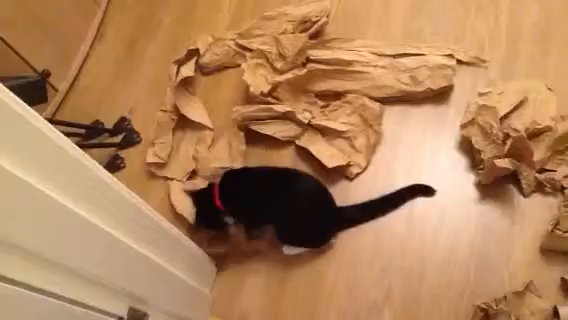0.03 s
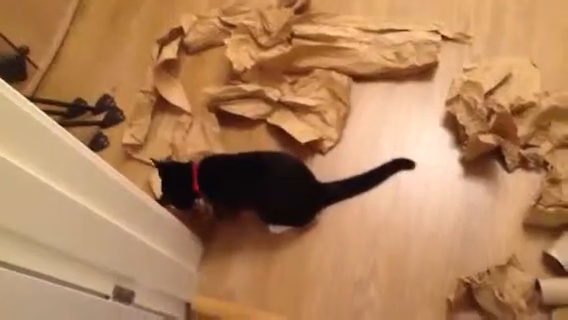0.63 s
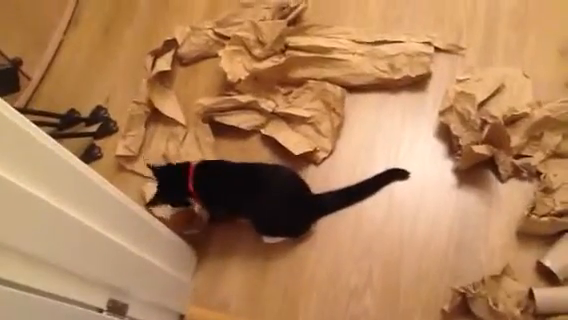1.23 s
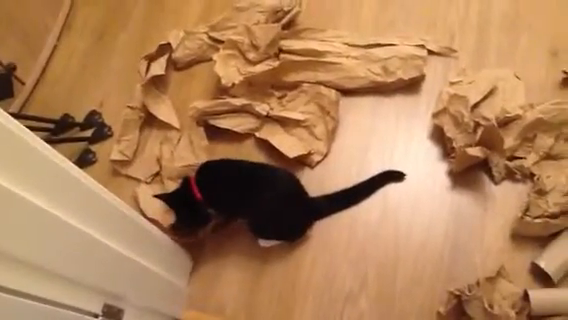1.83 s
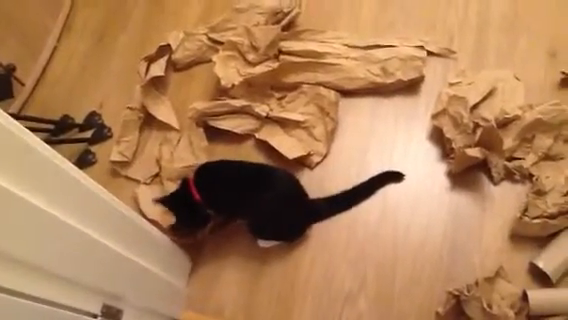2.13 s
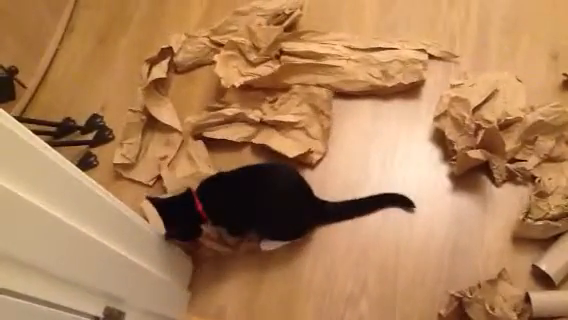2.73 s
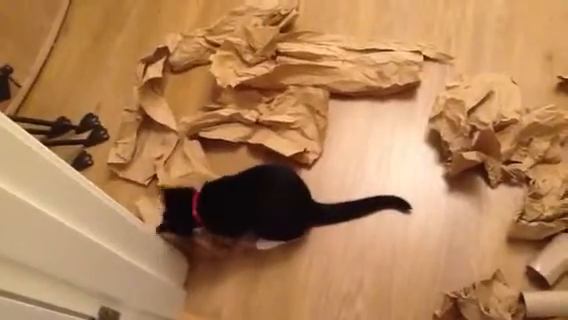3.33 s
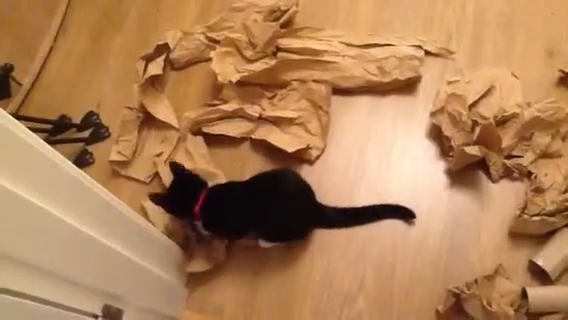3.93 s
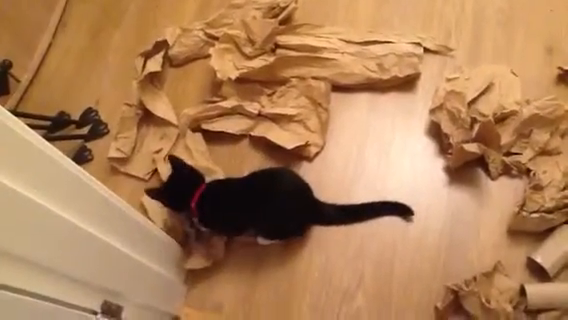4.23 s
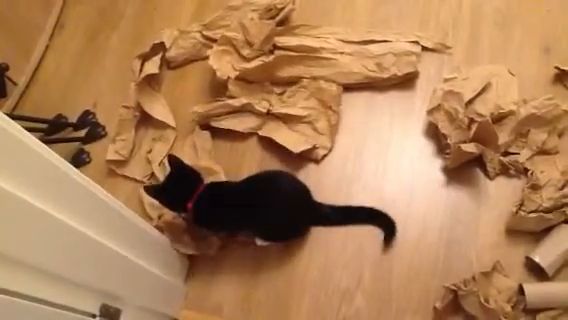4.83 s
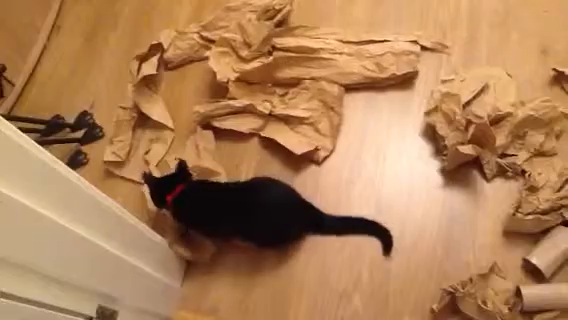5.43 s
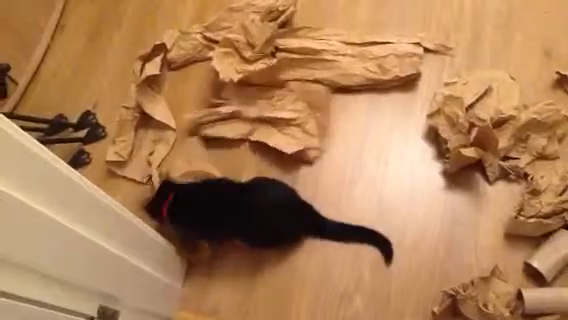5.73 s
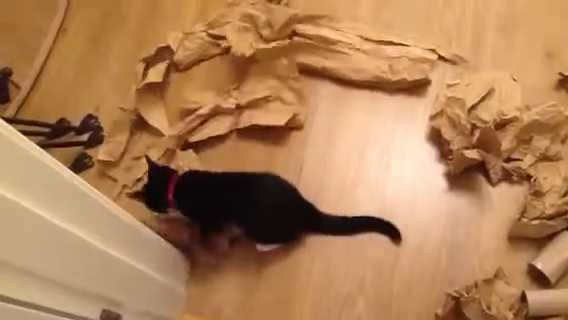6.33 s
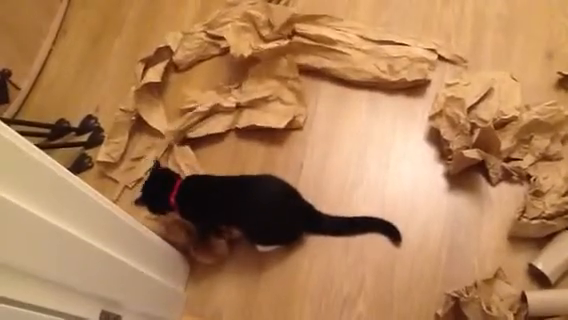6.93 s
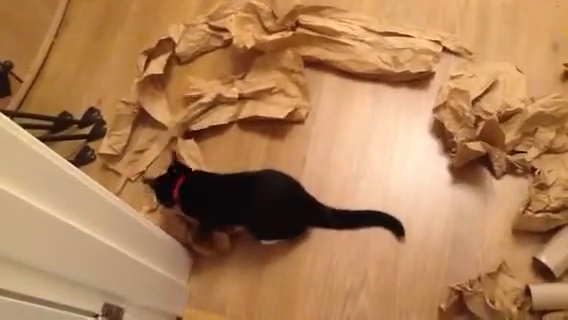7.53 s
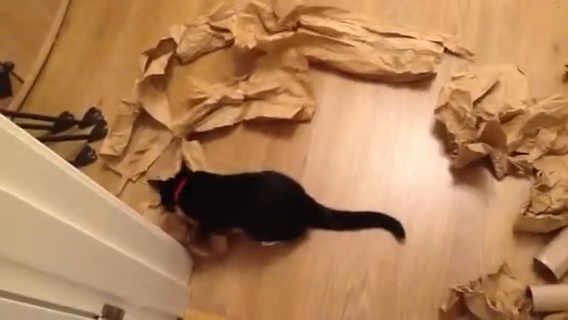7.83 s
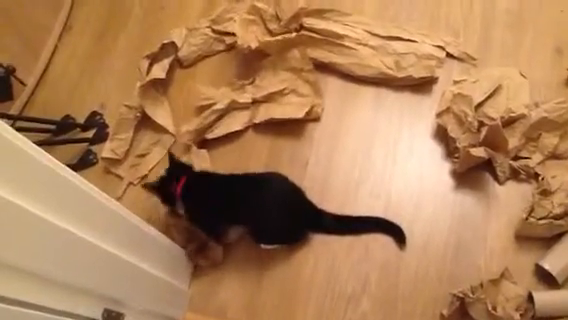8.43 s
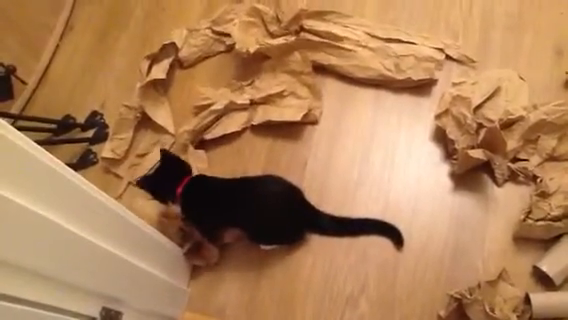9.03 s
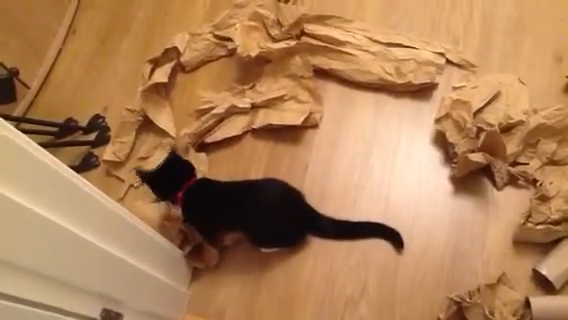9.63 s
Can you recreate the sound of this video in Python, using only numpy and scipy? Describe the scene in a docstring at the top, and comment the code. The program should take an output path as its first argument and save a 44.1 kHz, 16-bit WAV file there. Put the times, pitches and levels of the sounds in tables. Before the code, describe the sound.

A kitten paws at crumpled packing paper in a small bare room, heard close up over faint hiss. The paper crackles in uneven bursts, with stiff folds snapping and hollow little pops. A paw bumps the wooden floor and a collar bell clacks. Lighter rustles follow, then a quick run of soft bumps and the longest rustle. Near the end, after more crinkling, the bell tinkles briefly.

```python
"""A small bare room with a wooden floor; a small microphone close to the packing paper beside the door.
Over faint hiss a kitten paws at the crumpled paper: each push buckles a swarm of creases, stiff folds
snap and broad panels pop. A paw bumps the wood and the collar bell clacks. Lighter pushes follow, a run
of bumps just after four seconds, then the longest rustle around six. Near the end the bell tinkles
freely. The room rings briefly after every sound."""
import sys
import numpy as np
from scipy import signal
from scipy.fft import rfft, irfft
from scipy.io import wavfile
from scipy.ndimage import uniform_filter1d

SR = 44100
rng = np.random.default_rng(int(sys.argv[2]) if len(sys.argv) > 2 else 0)


def transcribe(signal):
    """Save signal, clipped to [-1, 1], as a 16-bit WAV file at the path in sys.argv[1]."""
    frames = np.atleast_2d(signal).T
    limited = np.clip(frames, -1, 1)
    pcm = np.round(limited * 32767).astype(np.int16)
    wavfile.write(sys.argv[1], SR, pcm)


N = 426888
TIME = np.arange(N) / SR
BINS_HZ = np.fft.rfftfreq(N, 1 / SR)

# The tone of the packing paper. Each row: frequency in Hz, gain in dB.
PAPER_SPECTRUM = [(50, -61), (110, -19.5), (170, -8.5), (260, -4.5), (370, -5.5), (750, -2.5), (1400, 1),
                  (2300, -2), (3600, -2.5), (7500, -3.5), (9500, -5), (11200, -4), (13500, -7), (15500, -7)]
# Stiff folds snapping; a long one is a run of creases giving way together.
# Each row: start in seconds, relative peak in dB, dullness in dB, t60 in seconds.
FOLD_SNAPS = [(.011, -36.5, -16, .02), (.085, -33.5, 1, .029), (0.127, -22, -1, .042),
              (0.2399, -30, -15, .036), (.344, -34, -3, 0.28), (.371, -27.5, 0, 0.04),
              (0.5314, -42, -4, 0.039), (0.638, -41, -16, 0.018), (0.7351, -34, -0.5, 0.32),
              (.765, -30, -6.5, 0.12), (1.11, -54.5, 0, 0.15), (1.5, -36, 1, 0.022),
              (1.5706, -30.5, -20, 0.019), (2.3123, -33, 2.5, .035), (2.5618, -33.5, -3, 0.039),
              (2.5736, -31, 2, 0.092), (2.663, -28, -23, 0.047), (2.679, -32.5, -1.5, 0.028),
              (2.924, -49, -22, 0.04), (3.056, -53.5, 6, 0.044), (3.1777, -54, -16, 0.023),
              (3.3408, -52, -12, 0.031), (3.386, -31, -20, .025), (3.408, -35, -18, .018),
              (3.5125, -36.5, 1, 0.065), (3.532, -32, -0.5, 0.068), (4.188, -37, 18, 0.09),
              (4.555, -43, 0, 0.14), (4.592, -30, -2, .011), (5.676, -32, -15, 0.025),
              (5.796, -31.5, -9, 0.042), (5.8436, -29.5, -17, .015), (6.038, -31, 0, 0.022),
              (6.157, -32, -10, .085), (6.227, -26, -4.5, .1), (7.357, -53, -10.5, 0.035),
              (7.589, -41, 4, .029), (7.7654, -32, -24, 0.013), (7.829, -39.5, 4, 0.026),
              (7.97, -39, -4, 0.035), (8.054, -30, -14, .014), (8.112, -34.5, -19, .015),
              (8.199, -34, -11.5, 0.03), (8.436, -35, 0, 0.096), (8.4554, -29, 12, 0.024)]


def amp(db):
    """Decibels to gain."""
    return 10 ** (np.asarray(db) / 20)


def unit(x):
    """Scales to rms 1."""
    return x / np.sqrt(np.mean(x ** 2) + 1e-20)


def peaked(x, db, size):
    """Scales a short sound so that its loudest stretch of size samples has the level db."""
    return amp(db) * x / np.sqrt(uniform_filter1d(x ** 2, size).max())


def read(points, hz):
    """Reads a table on a log-frequency axis."""
    points_hz, values = np.transpose(points)
    return np.interp(np.log(hz + 1), np.log(points_hz + 1), values)


def add(mix, start, sound):
    """Lays a sound into the mix at start seconds."""
    part = mix[max(round(start * SR), 0):][:len(sound)]
    part += sound[:len(part)]


def drift(per_s):
    """A continuous random wander of rms 1."""
    knots = rng.standard_normal(1024)
    return unit(np.interp(TIME * per_s, np.arange(len(knots)), knots))


def low_cut(x, hz, order=2):
    """Rolls off the bass below hz."""
    return signal.sosfilt(signal.butter(order, hz, "high", fs=SR, output="sos"), x)


def colour(x, db_at, size=4096):
    """Causal filter with the gain db_at(Hz), so that clicks keep their sharp front."""
    hz = abs(np.fft.fftfreq(size, 1 / SR))
    log_gain = np.log(amp(np.maximum(db_at(hz), -100)))
    minimum_phase = np.exp(np.conj(signal.hilbert(log_gain)))
    return signal.oaconvolve(x, np.fft.ifft(minimum_phase).real)[:len(x)]


def split(x, edges_hz):
    """Bands between the edges, low to high, that sum to x."""
    below = [1 / (1 + (BINS_HZ / hz) ** 4) for hz in edges_hz]
    return irfft(rfft(x) * np.diff(below, axis=0, prepend=0, append=1), N)


def ring(modes, detune, rise_s, size=16384):
    """Dying modes with a soft start; each blow lands elsewhere and detunes them a little."""
    t = np.arange(size) / SR
    tones = np.zeros(size)
    for hz, db, t60 in modes:
        struck_hz = hz * (1 + detune * rng.normal())
        tones += amp(db - 60 * t / t60) * np.cos(2 * np.pi * (struck_hz * t + rng.random()))
    return tones * (1 - np.exp(-t / rise_s))


def burst(t60, size=2048):
    """Dying noise: the dense ring of a patch of paper flipping, or a scuff."""
    t = np.arange(size) / SR
    return rng.standard_normal(size) * amp(-60 * t / max(t60, 1e-3))


def hiss(level_db=-64.5):
    """Steady microphone hiss over the low murmur of the room."""
    # The noise floor. Each row: frequency in Hz, relative level in dB.
    noise_spectrum = [(30, -19), (55, -14), (80, 3.5), (110, -5), (170, 6.5), (280, 3), (420, -2),
                      (600, 1.5), (1100, -7), (2300, -11.5), (4500, -11.5), (8000, -11), (13000, -14.5),
                      (15500, -15.5)]
    white = rfft(rng.standard_normal(N))
    return amp(level_db) * unit(irfft(white * amp(read(noise_spectrum, BINS_HZ)), N))


def pawing(resting_db=-72.5, settle_db=-39.5, settle_t60=2.1):
    """Power put into the sheet, in all and in its dull and crisp parts: pushes swell, let go, settle."""
    # A paw or the head pushes into the paper. Each row: start in seconds, swell in seconds, strength
    # in dB, release t60 in seconds, share of broad dull panels in dB, share of fine crisp creases in dB.
    pushes = [(0, 0.0017, -42.5, 1.1, -1.5, -6.5), (.075, 0.066, -28, 0.65, 1, -4.5),
              (.23, 0.026, -39, 1.05, -2.5, -2), (.33, 0.047, -26.5, 0.26, -5, 0),
              (.52, 0.018, -52, 1.35, -2, -1), (0.728, 0.024, -34.5, 0.22, -12, 7),
              (1.2, .16, -63.5, 1.6, 5.5, 3), (1.4, 0.13, -43, 0.25, -3, -2.5),
              (1.55, 0.028, -45, 0.28, 0.5, -3), (2.15, 0.082, -40.5, .6, -2, -3.5),
              (2.295, 0.023, -31.5, 0.75, -3.5, -3.5), (2.31, 0.063, -37, 0.25, 5, 8),
              (2.56, 0.027, -32.5, 0.14, -3.5, 5.5), (2.635, 0.027, -36, 0.36, -2, 2),
              (2.82, 0.1, -60.5, 1.1, 3.5, 1), (3.34, .07, -50, 1, 0.5, 0.5),
              (3.495, 0.034, -37.5, 0.23, -2.5, -10), (3.83, .04, -64, 0.65, 6, -8),
              (4.15, 0.053, -44, 0.64, -3, -17), (4.36, 0.014, -44.5, 0.74, -3.5, -6.5),
              (4.545, 0.062, -38.5, .35, -4, -4.5), (4.6, 0.054, -37.5, .28, -1.5, 0),
              (5.04, 0.11, -55, 1.6, -1, -4), (5.2, 0.11, -52, 0.27, 0.5, -8),
              (5.335, 0.049, -37.5, 0.34, -1, -6), (5.44, 0.09, -41, 1.2, -4, -10),
              (5.6, 0.056, -36, 1.4, -5.5, -6), (5.75, 0.17, -33, 0.43, -3.5, -1),
              (6.01, 0.024, -34.5, 0.56, -3.5, -6), (6.061, .05, -35, 0.55, -6, -2.5),
              (6.13, 0.034, -30.5, 0.89, -2.5, -5), (6.215, 0.037, -28.5, .3, -1, 0),
              (6.27, .065, -36.5, 0.17, 0.5, 1), (6.86, 0.035, -61, 0.5, 10, -1),
              (6.93, 0.078, -44.5, 0.36, 5, 0.5), (7.564, 0.031, -42, 0.41, -0.5, -2),
              (7.79, 0.034, -52, 2.2, 4.5, -3), (7.965, 0.012, -42, 0.32, -16, 1),
              (8.0, 0.051, -31, 0.32, -5, -4), (8.19, 0.023, -40, .4, -7, -9.5),
              (8.27, 0.06, -41.5, .5, -0.5, -5), (8.424, 0.038, -31.5, 0.18, 2.5, 0.5),
              (8.71, 0.043, -49, 0.37, -5, 2)]
    power = np.full((3, N), amp(resting_db) ** 2)  # the paper always stirs faintly under the kitten
    t = np.arange(2 * SR) / SR
    for start, swell, db, t60, dull_db, crisp_db in pushes:
        after = np.maximum(t - swell, 0)
        release = amp(-60 * after / t60)
        creep_back = amp(settle_db - 60 * after / settle_t60)
        push = amp(db) * np.minimum(t / swell, 1) * (release + creep_back)
        for part, share_db in zip(power, (0, dull_db, crisp_db)):
            add(part, start, (push * amp(share_db)) ** 2)
    return power


def creases(per_s=4000, facets=20, shortest_t60=0.0078, wander_db=3):
    """Creases buckle on many facets; the load wanders between them, so the colour keeps changing."""
    sizes = amp(2.6 * np.minimum(rng.exponential(1, N), 5))
    sizes *= rng.random(N) < per_s / SR
    owner = rng.integers(0, facets, N)
    crackle = np.zeros(N)
    for facet in range(facets):
        clicks = sizes * (owner == facet) * amp(wander_db * drift(per_s=18))
        facet_ring = burst(shortest_t60 * rng.uniform(1.0, 2.63))
        crackle += signal.oaconvolve(clicks, facet_ring)[:N]
    # even out the level: the creases share the work that the paw does
    return crackle / np.sqrt(abs(uniform_filter1d(crackle ** 2, size=900)) + 1e-9)


def hollows(sheet, depth_db=1.8):
    """Pockets in the crumpled sheet open and close, each lifting its own band for a moment."""
    bands = split(sheet, np.geomspace(500, 11000, 12))
    return sum(band * amp(depth_db * drift(per_s=16)) for band in bands)


def rustle(level_db=-5, slide_db=-6, broad_db=1, fine_db=2):
    """Under each push the creases crackle while the sheet slides over itself."""
    friction = creases() + amp(slide_db) * rng.standard_normal(N)
    sheet = colour(friction, lambda hz: read(PAPER_SPECTRUM, hz))
    body, broad, middle, fine = split(hollows(sheet), edges_hz=[650, 1900, 7000])
    strength_db, dull_db, crisp_db = 10 * np.log10(pawing())
    dull = (body + broad * amp(broad_db)) * amp(dull_db - strength_db)
    crisp = fine * amp(crisp_db - strength_db + fine_db)
    return amp(strength_db + level_db) * (dull + middle + crisp) / np.std(middle)


def sticking(dip_db=-3.5, hold_s=0.016):
    """Gain of the rustle: the sheet holds back while the load builds on a fold, until it snaps."""
    starts = np.sort([row[0] for row in FOLD_SNAPS])
    next_snap = np.append(starts, np.inf)[np.searchsorted(starts, TIME)]
    return amp(dip_db * np.exp(-(next_snap - TIME) / hold_s))


def snaps(rise_s=0.0004, dull_hz=1800, fold_hz=4100, ring_db=6, ring_octaves=0.83):
    """A stiff fold gives way within a millisecond and rings briefly; large folds sound duller."""
    out = np.zeros(N)
    for start, db, dull_db, t60 in FOLD_SNAPS:
        centre_hz = fold_hz * 2 ** (-dull_db / 30)  # an octave lower for every 30 dB of dullness

        def tone_db(hz):
            low_shelf = (dull_db + 8) / (1 + (hz / dull_hz) ** 2)
            resonance = ring_db / (1 + (np.log2((hz + 1) / centre_hz) / ring_octaves) ** 2)
            return read(PAPER_SPECTRUM, hz) + low_shelf + resonance

        crack = burst(t60, size=8192)
        crack *= 1 - np.exp(-np.arange(len(crack)) / SR / rise_s)
        add(out, start - rise_s, peaked(colour(crack, tone_db), db, size=90))
    return out


def pops(level_db=-1, ring_t60=0.027, flutter_t60=0.06):
    """A broad panel flips, flutters and rings hollow for a moment."""
    # Panels of paper popping through. Each row: start in seconds, relative peak in dB, pitch in Hz.
    panel_pops = [(.129, -23.5, 810), (.14, -29, 1390), (0.163, -25.5, 1130), (.168, -29, 775),
                  (1.115, -62, 2720), (2.313, -37, 1470), (2.576, -39, 1140), (3.506, -38.5, 1420),
                  (3.514, -40, 1050), (4.374, -44, 1660), (5.879, -32.5, 1390), (6.239, -28, 1420),
                  (8.048, -30.5, 1475), (8.457, -26.5, 1370), (8.462, -32.5, 820)]
    out = np.zeros(N)
    for start, db, hz in panel_pops:
        modes = [(hz, 0, ring_t60), (1.72 * hz, -9, ring_t60 / 2)]
        panel = ring(modes, detune=0, rise_s=0.00023, size=4096)
        pop = signal.fftconvolve(burst(flutter_t60, size=8192), panel)
        add(out, start, peaked(pop, db + level_db, size=128))
    return low_cut(out, hz=300)


def paw_bumps(level_db=-1, scuff_db=-16, focus_db=9, below_db=-14, above_db=-28):
    """A padded blow and a short scuff set the wood ringing; the place struck favours some modes."""
    # Soft blows on the wood. Each row: start in seconds, relative peak in dB, most excited
    # frequency in Hz, scuff t60 in seconds.
    blows = [(.345, -42, 298, 0.16), (.40, -44, 187, 0.21), (1.228, -55, 298, 0.035),
             (2.0, -55.5, 285, 0.016), (3.935, -54, 310, 0.33), (4.155, -41.5, 760, 0.12),
             (4.186, -34.5, 840, 0.099), (4.21, -41, 800, 0.14), (4.275, -34, 485, 0.11),
             (4.314, -40.5, 514, 0.048), (4.364, -39, 515, 0.17), (4.394, -41, 420, 0.087),
             (6.457, -44.5, 384, 0.24), (6.884, -47, 280, 0.23), (7.058, -43.5, 302, 0.28),
             (7.51, -45.5, 330, 0.05), (7.879, -51.5, 293, 0.17)]
    # The wood's ring; the first, nearly dead mode is the soft push of the pad.
    # Each row: frequency in Hz, level in dB, t60 in seconds.
    wood_modes = [(362, 11.5, 0.0073), (230, -7.5, 0.06), (309, -6.5, 0.044), (422, -1.5, 0.035),
                  (510, -2, 0.052), (594, -6.5, 0.059), (704, -2, 0.036), (820, -5, 0.026),
                  (1130, -6, 0.036), (1265, -12, 0.043), (1700, -12, 0.061)]
    out = np.zeros(N)
    for start, db, centre_hz, scuff_t60 in blows:
        def place_db(hz):
            favoured = -focus_db * np.log2((hz + 1) / centre_hz) ** 2
            return np.maximum(favoured, np.where(hz < centre_hz, below_db, above_db))

        force = amp(scuff_db) * burst(scuff_t60, size=12288)
        force[0] += 1  # the blow itself
        wood = signal.fftconvolve(force, ring(wood_modes, detune=0.013, rise_s=0.0004))
        thud = low_cut(colour(wood, place_db), hz=110, order=4)
        add(out, start, peaked(thud, db + level_db, size=256))
    return out


def collar_bell(clack_db=-3.5, ring_db=-5, bounce_s=0.007, bounces=4):
    """The loose pellet clacks and bounces in the slotted shell, which rings when it hangs free."""
    # The pellet's strikes; fur often damps the ring.
    # Each row: start in seconds, relative clack level in dB, relative ring level in dB.
    strikes = [(.373, -26, -52), (.852, -38, -36), (.884, -46, -33.5), (2.354, -23, -60), (2.375, -31, -60),
               (4.374, -37, -57), (4.391, -35.5, -60), (8.728, -44, -51), (8.793, -31.5, -29),
               (8.806, -42, -23), (8.842, -45, -29), (8.904, -39, -30.5), (8.985, -64, -54)]
    # The shell's short clack and its free ring. Each row: frequency in Hz, level in dB, t60 in seconds.
    clack_modes = [(6180, 8, 0.007), (6830, 4.5, 0.025), (7500, 0, 0.056), (8170, -2, .015)]
    shell_modes = [(5935, -5, .07), (5946, 0, .11), (6310, -14, .06), (14535, -11, .1), (15280, -8, .09)]
    out = np.zeros(N)
    for start, hit_db, free_db in strikes:
        for k in range(bounces):
            clack = amp(hit_db + clack_db - 9 * k) * ring(clack_modes, detune=0.03, rise_s=0.0005)
            tinkle = amp(free_db + ring_db - 5 * k) * ring(shell_modes, detune=0.002, rise_s=0.0008)
            add(out, start + k * bounce_s * rng.uniform(0.79, 1.3), clack + tinkle)
    return out


def room(x, wet_db, build_s=0.0018, echoes_per_s=6000):
    """Floor, door and walls answer within milliseconds; the treble dies first."""
    # The bare room's decay. Each row: frequency in Hz, t60 in seconds.
    decay_times = [(200, 0.56), (530, 0.43), (1400, 0.36), (3700, 0.33), (9700, 0.22), (15000, 0.14)]
    echoes = rng.standard_normal(SR) * (rng.random(SR) < echoes_per_s / SR)
    hz, t, spectra = signal.stft(echoes, SR, nperseg=256)
    decay = amp(-60 * t / read(decay_times, hz)[:, None])
    tail = signal.istft(spectra * decay, SR, nperseg=256)[1]
    tail *= 1 - np.exp(-np.arange(len(tail)) / SR / build_s)
    return x + amp(wet_db) * signal.fftconvolve(x, tail / np.linalg.norm(tail))[:N]


def scene():
    """Paper, wood and bell in the one room, heard in mono from close by."""
    paper = room(rustle() * sticking(), wet_db=-9) + room(snaps() + pops(), wet_db=-6)
    wood = room(paw_bumps(), wet_db=-6)
    bell = room(collar_bell(), wet_db=-4)
    return (paper + wood + bell + hiss())[None]


def record(dry, bass_hz=120, top_hz=15500):
    """A small microphone that loses the deep bass; the highest treble is cut off too."""
    band_limit = signal.firwin(511, top_hz, window=("kaiser", 9), fs=SR)
    return signal.oaconvolve(low_cut(dry, bass_hz), band_limit[None], "same")


dry = scene()
out = record(dry)
transcribe(out)
```